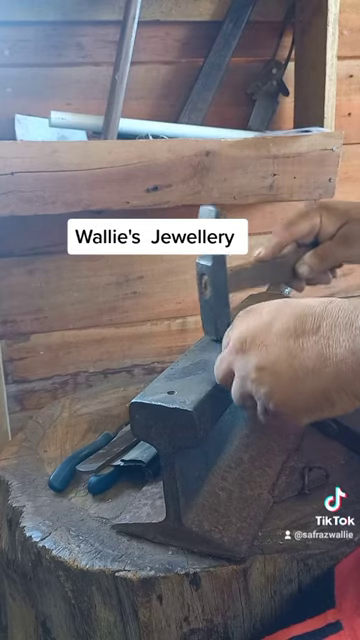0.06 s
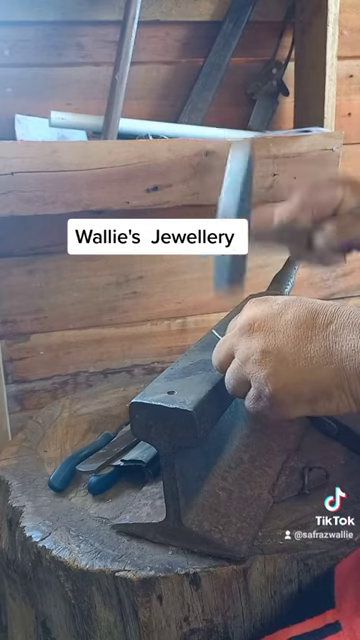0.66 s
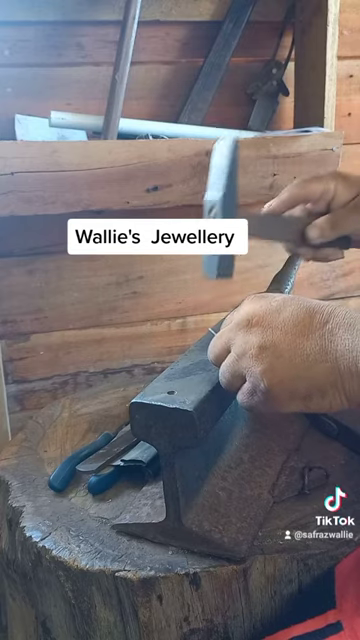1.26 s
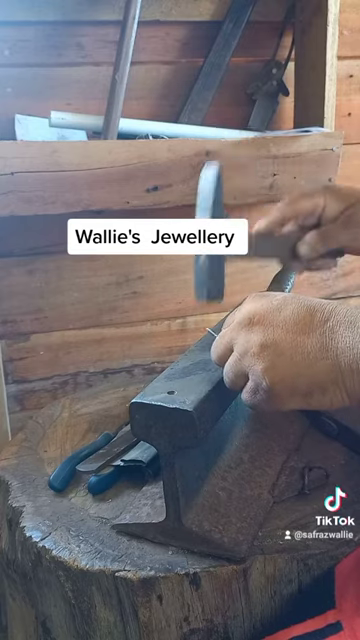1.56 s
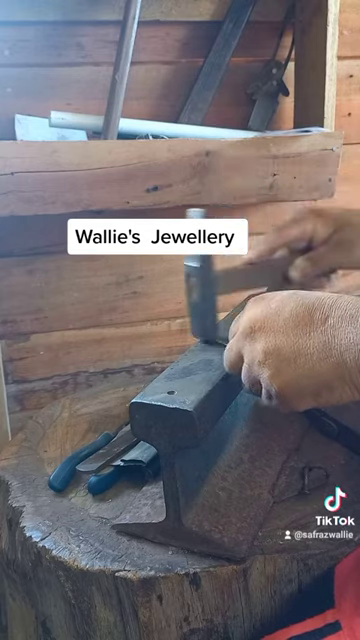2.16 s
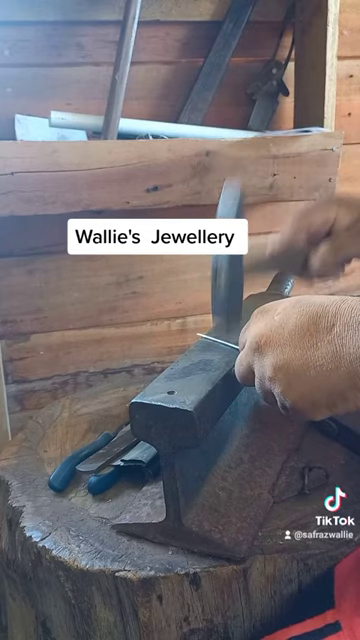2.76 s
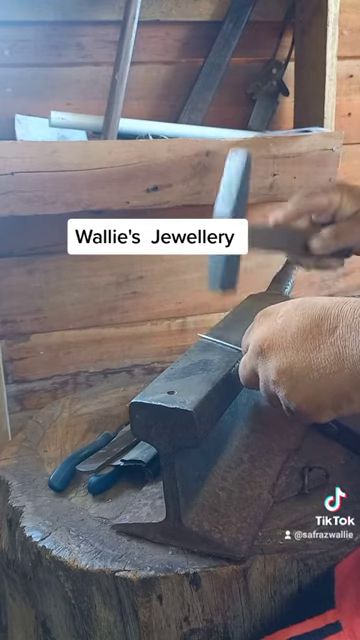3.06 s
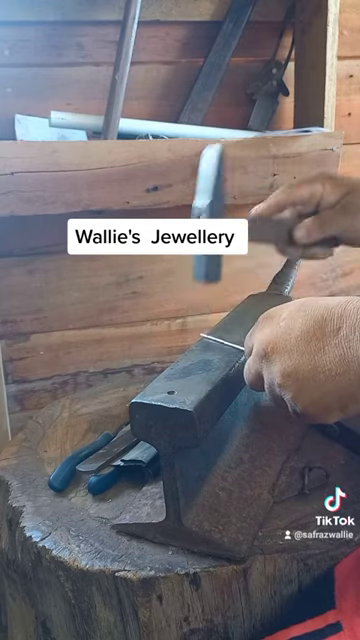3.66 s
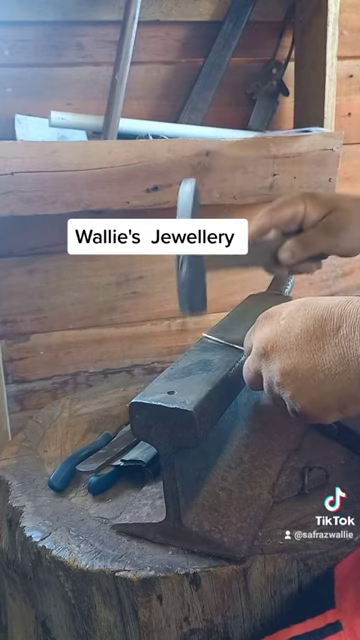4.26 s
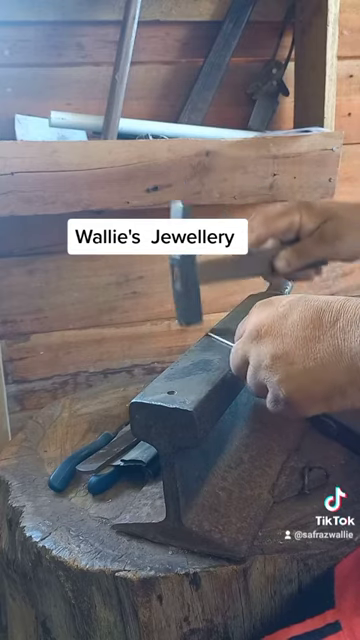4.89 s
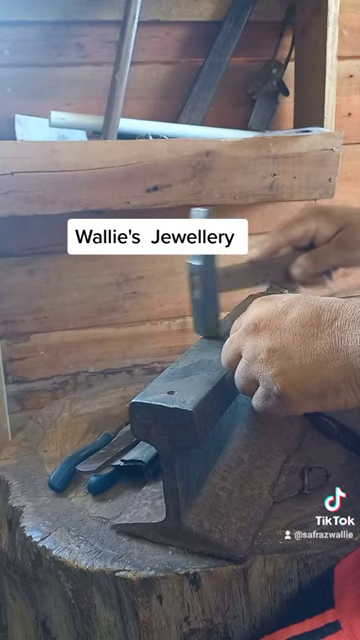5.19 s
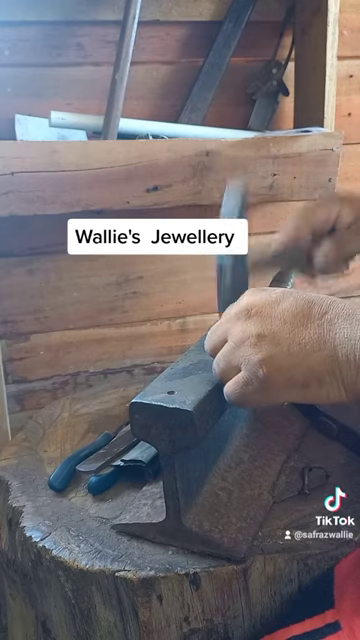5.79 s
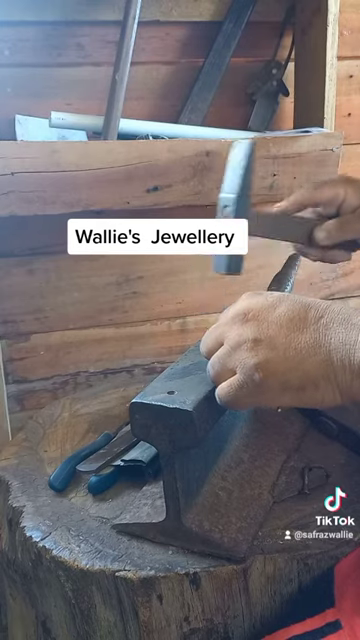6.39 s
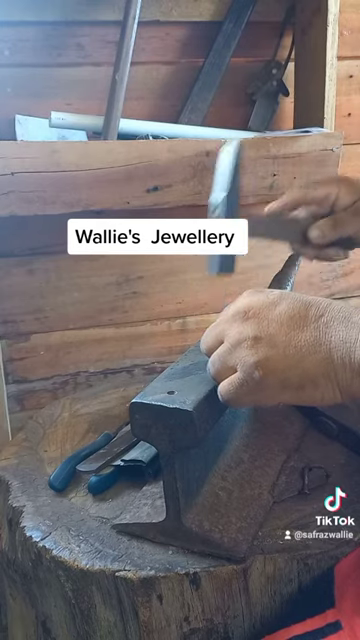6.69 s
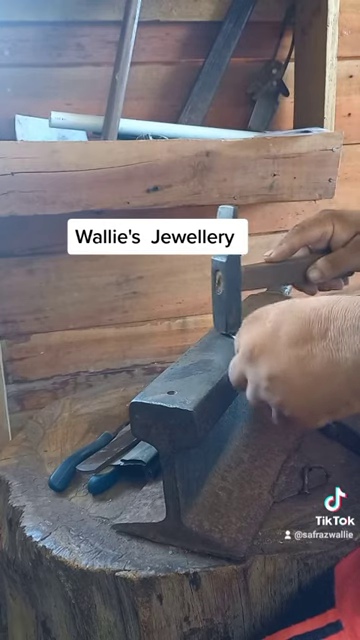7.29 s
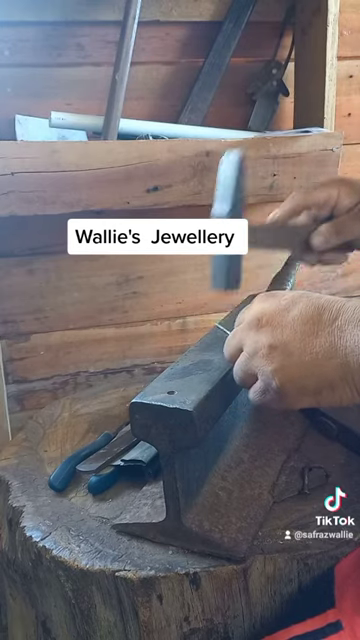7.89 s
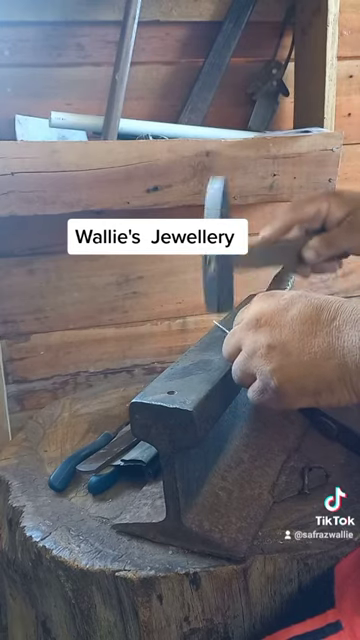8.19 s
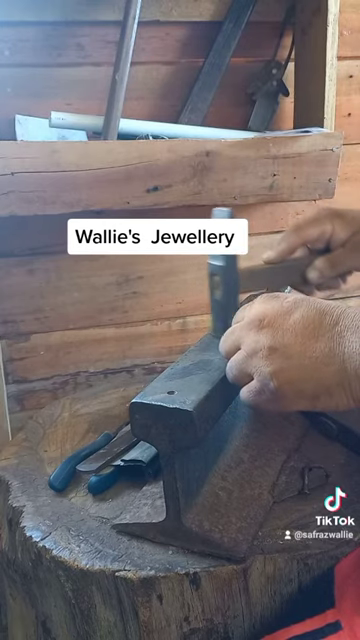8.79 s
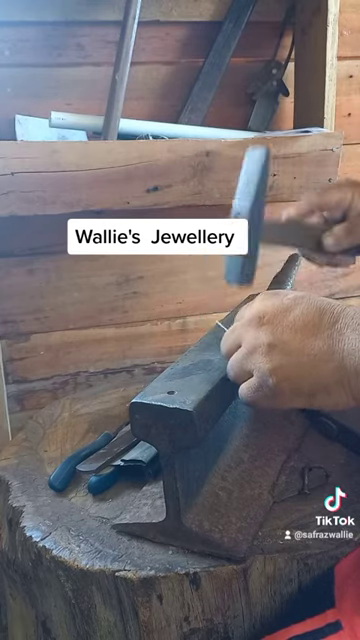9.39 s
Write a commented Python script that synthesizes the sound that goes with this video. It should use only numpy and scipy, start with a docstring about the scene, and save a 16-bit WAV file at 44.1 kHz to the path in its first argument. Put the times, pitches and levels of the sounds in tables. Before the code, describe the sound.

A small hammer flattens a metal strip on a steel anvil set on a tree stump, about three blows a second. Each blow is a sharp crack with a short bright ring and a low thud, thickened by nearby plank walls. After a long even run it pauses briefly, the strip faintly rubs and knocks, then the hammering resumes. The microphone is close, with a quiet outdoor hush behind.

```python
"""Hammering metal in a shed

A small hammer flattens a metal strip on a rail anvil set on a tree stump, about three blows a second.
Each blow is a crack, a thud of the stump and a short ring of steel, thickened by close plank walls.
The force is nearly even; how squarely and where the hammer lands sets the brightness and the rings.
In the one pause the hand shifts the strip and a faint whistle sounds.
Now and then a thin hiss falls in pitch over a quiet outdoor hush."""
import sys
import numpy as np
from scipy import signal
from scipy.fft import rfft, irfft, next_fast_len
from scipy.io import wavfile
from scipy.ndimage import uniform_filter1d, map_coordinates

SR = 44100
rng = np.random.default_rng(int(sys.argv[2]) if len(sys.argv) > 2 else 0)


def store_pcm(level_fs):
    """Save levels as 16-bit WAV."""
    pcm = np.round(np.clip(level_fs, -1, 1) * 32767).astype(np.int16)
    wavfile.write(sys.argv[1], SR, np.atleast_2d(pcm).T)


N = 425565
SIZE = 40960  # samples in one blow with its echoes
HZ = np.fft.rfftfreq(SIZE, 1 / SR)


def amp(db):
    """Turn decibels into a gain."""
    return 10 ** (np.asarray(db) / 20)


def unit(x):
    """Scale x to an average power of 1."""
    return x / np.sqrt(np.mean(x ** 2) + 1e-20)


def along(points, hz):
    """Read between rows of frequency and value, on a log frequency scale."""
    f, v = np.transpose(points)
    return np.interp(np.log(hz + 1), np.log(f + 1), v)


def filtered(x, response):
    """Scale each frequency in x by response(hz)."""
    n = x.shape[-1]
    m = next_fast_len(n + SR // 2)
    return irfft(rfft(x, m) * response(np.fft.rfftfreq(m, 1 / SR)), m)[..., :n]


def causal(gain):
    """A spectrum with this gain whose sound starts only when it is struck."""
    cepstrum = irfft(np.log(np.maximum(gain, 1e-6)))
    forward_only = np.r_[1, np.full(SIZE // 2 - 1, 2), 1, np.zeros(SIZE // 2 - 1)]
    return np.exp(rfft(cepstrum * forward_only))


def to_sound(spectrum):
    """Turn a blow's spectrum into sound that fades to silence."""
    return irfft(spectrum) * np.clip(np.linspace(4, -1, SIZE), 0, 1)


def panned(db):
    """Two gains of fixed total power, the left db above the right."""
    pair = np.array([amp(db / 2), amp(-db / 2)])
    return pair / np.sqrt(np.mean(pair ** 2, axis=0))


def stereo_noise(size):
    """White noise at two microphones: alike in the bass, unrelated in the treble."""
    # Each row: frequency in Hz, likeness of left and right (1 is identical).
    likeness = [(220, 0.95), (700, 0.87), (1400, 1), (5000, 0.019)]
    turn = lambda hz: np.arccos(np.clip(along(likeness, hz), -1, 1)) / 2
    shares = lambda hz: np.array([np.cos(turn(hz)), np.sin(turn(hz))])
    mid, side = filtered(rng.standard_normal((2, size)), shares)
    return np.array([mid + side, mid - side])


def noise_band(size, pitch_hz, width_hz):
    """Stereo noise gathered around one pitch."""
    return unit(filtered(stereo_noise(size), lambda hz: 1 / (1 + ((hz - pitch_hz) / width_hz) ** 2)))


def add(out, start, sound):
    """Mix a sound into out, from start seconds on."""
    part = out[:, max(round(start * SR), 0):][:, :sound.shape[-1]]
    part += sound[..., :part.shape[-1]]


def hush(db):
    """The steady, distant noise of the outdoors."""
    # Each row: frequency in Hz, relative level in dB.
    colour = [(25, -30), (42, -20.5), (65, -2.5), (130, -4.5), (250, -18.5), (500, -23.5), (1200, -29.5),
              (2100, -23), (2800, -32), (4000, -24), (6000, -30), (10000, -32.5), (15000, -44.5)]
    return amp(db) * unit(filtered(stereo_noise(N), lambda hz: amp(along(colour, hz))))


def falling_hisses(width_hz):
    """Faint, narrow bands of noise slide down in pitch."""
    # Each row: start in seconds, level in dB.
    hisses = [(0.031, -58.5), (4.148, -54), (7.061, -58)]
    # Each row: seconds into a hiss, pitch in Hz, level change in dB.
    glide = [(0, 8800, -19), (.08, 8000, -1), (.14, 7070, -5.5), (0.199, 6440, -2), (0.272, 6250, -7.5),
             (.35, 6140, -10)]
    out = np.zeros((2, N))
    times, pitch, change_db = np.transpose(glide)
    t = np.arange(int(times[-1] * SR)) / SR
    tone = np.exp(2j * np.pi * np.cumsum(np.interp(t, times, pitch)) / SR)
    fade = signal.windows.tukey(len(t), .2)
    keep_lows = lambda f: 1 / (1 + f / width_hz) / (1 + (f / 2500) ** 4)
    for start, db in hisses:
        flutter = filtered(rng.standard_normal((2, 2, len(t))), keep_lows)
        hiss = unit(flutter[0] * tone.real + flutter[1] * tone.imag)
        add(out, start, hiss * amp(db + np.interp(t, times, change_db)) * fade)
    return out


def hand_bumps(width_hz):
    """The hand resettles the strip with dull, soft knocks."""
    # Each row: start in seconds, level in dB, pitch in Hz, seconds to fade by 60 dB.
    bumps = [(.295, -63, 170, 0.11), (7.366, -48.5, 272, .25)]
    out, t = np.zeros((2, N)), np.arange(SR // 2) / SR
    rise = 1 - np.exp(-t / 0.0041)
    for start, db, hz, fade_s in bumps:
        add(out, start, noise_band(len(t), hz, width_hz) * amp(db - 60 * t / fade_s) * rise)
    return out


def shed(walls_fade_s):
    """The path to the microphones, as a spectrum: straight sound, plank echoes and a low boom."""
    # The boom. Each row: frequency in Hz, dB against the first echoes.
    boom_db = [(110, -7), (200, -2.5), (400, -17.5), (700, -29.5), (2000, -35.5), (2800, -30), (5000, -27),
               (8000, -36)]
    # Each row: frequency in Hz, seconds for the boom to fade by 60 dB.
    boom_fade = [(110, 0.78), (300, 0.41), (1000, 0.84), (3000, 0.8), (4500, 0.45)]
    # The straight sound. Each row: frequency in Hz, dB against the echoes.
    straight = [(150, -3), (400, -7.5), (900, -8.5), (2500, -11.5), (8000, -28.5)]
    hz, t, noise = signal.stft(stereo_noise(SIZE), SR, nperseg=256)
    boom = amp(along(boom_db, hz)[:, None] - 60 * t / along(boom_fade, hz)[:, None])
    walls = amp(-60 * t / walls_fade_s)
    echoes = signal.istft(noise * np.hypot(walls, boom), SR, nperseg=256)[1][:, :SIZE]
    return rfft(unit(echoes)) / np.sqrt(SIZE) + amp(along(straight, HZ))


def evened(path, width_hz):
    """Level out a path's broad tone colour but keep its fine ripple."""
    smooth = lambda v: uniform_filter1d(v, max(int(width_hz / HZ[1]), 1), axis=-1)
    power = smooth(smooth(np.abs(path) ** 2))
    return path * causal(1 / np.sqrt(np.abs(power) + 1e-9))


def contact_colour(db):
    """The broad crack and thud of contact, with fine random peaks and dips in the treble."""
    # Each row: frequency in Hz, relative level in dB.
    colour = [(40, -53), (80, -30.5), (115, -14.5), (150, -16), (205, -23.5), (300, -15), (480, -19),
              (640, -23), (850, -19.5), (1200, -24), (2000, -15), (2800, -23.5), (3700, -23.5),
              (6500, -33.5), (8000, -33.5), (9800, -44.5), (15000, -42.5)]
    # Each row: frequency in Hz, left over right in dB.
    sides = [(150, 0), (350, 1), (700, -2.5), (2100, -10), (3500, -3.5), (6500, -12), (9000, 1)]
    knots = HZ / 70  # a new random value every 70 Hz
    depth_db = along([(1500, 0), (4000, 1.5), (8000, 3), (10000, 6)], HZ)
    ripple_db = depth_db * map_coordinates(rng.standard_normal(int(knots[-1]) + 4), [knots])
    return amp(db + along(colour, HZ) + ripple_db) * panned(along(sides, HZ))


def ring_boost_db(hz, start, spot):
    """The landing spot, the work's creep along the rail and chance favour some rings."""
    # Each row: pitch in Hz, dB at the middle of the face, dB per unit of spot, dB per second of creep.
    spot_rings = [(1709, -1, 4, 1), (4515, 2.5, 9.5, 0), (4950, 0.6, -0.5, 0.22), (6020, -2.5, -2.9, -0.2),
                  (7190, 1.5, 0.2, -0.3)]
    # Each row: frequency in Hz, random spread between blows in dB.
    scatter = [(400, .8), (2000, 1.2), (6000, 1.6)]
    ring_hz, middle_db, spot_db, creep_db_per_s = np.transpose(spot_rings)
    matches = np.abs(hz[:, None] / ring_hz - 1) < .02
    place_db = middle_db + spot_db * spot + creep_db_per_s * (start - N / SR / 2)
    return matches @ place_db + along(scatter, hz) * rng.standard_normal(len(hz))


def resonator(pitch_hz, width_hz):
    """The spectrum of one ring: the narrower it is, the longer it lasts."""
    return 1j * HZ * width_hz / (pitch_hz ** 2 - HZ ** 2 + 1j * HZ * width_hz)


def hammering(ring_db, contact_db, ring_direct_db, extra_damping_hz, stump_hz, rock_db, rock_delay_s):
    """Each blow cracks, sets the steel ringing and rocks the stump, all heard through the shed."""
    # Each row: start in seconds, force in dB, hardness in dB, spot on the face (0 is the middle).
    blows = [(0.3805, 0.6, -4.5, -1.7), (0.7287, 1.1, -0.5, 0.4), (1.0766, 2.2, -0.5, 0.2),
             (1.4168, 0.5, 2.5, -0.49), (1.763, 1.14, 0.5, 0.37), (2.11, 0.5, 3.5, -0.052),
             (2.4606, 0.46, -1, -0.21), (2.8053, 1, -1.5, -0.033), (3.1407, 0.1, 1, -0.58),
             (3.4803, 1.3, -1, -0.49), (3.8067, -0.1, 2.5, -0.94), (4.14, -0.4, 2.5, -0.044),
             (4.4796, -2, 7, -1.1), (4.8126, -0.2, 2.0, -0.24), (5.1586, 0.26, 1.5, 0.49),
             (5.5005, 0.7, 3, 0.11), (5.8358, 0, 2.0, -0.3), (6.1727, 0.9, 1, 0.54),
             (6.5057, 0.5, 0, -0.94), (6.833, 0.84, 1, -1.0), (7.714, 0.8, -1.5, 0.79),
             (8.071, -0.1, -0.5, 0.45), (8.4174, 0.4, 0, 0.3), (8.768, 1.06, -0.5, 0.13),
             (9.1292, 0.45, -4, 0.19), (9.4797, -0.5, -2.5, -0.7)]
    # The rings of anvil, hammer and stump. Each row: pitch in Hz, relative energy in dB,
    # seconds to fade by 60 dB before extra damping, left over right in dB.
    rings = [(270.0, 1.5, 0.24, -3.0), (376.0, 5.0, 0.05, -15.0), (450, -2, 0.22, -2), (560, -6, 0.2, -2),
             (689.0, -3.8, 0.082, 2.0), (1041.0, -1.5, 0.07, -8.0), (1378.0, -1.0, 0.12, -15.0),
             (1528.0, 2.2, 0.073, -14.0), (1709.0, 4.8, 0.176, -15.0), (1790.0, 4.5, 0.063, -14.0),
             (1860.0, 7.4, 0.033, -12.0), (1951.0, 7.5, 0.076, -15.0), (2285.0, 5.5, 0.07, -15.0),
             (3226.0, -1.8, 0.08, -1.0), (3561.0, 3.1, 0.015, -8.0), (4498.0, 5.6, 0.063, 0.0),
             (4524.0, 1.4, 0.09, 3.0), (4932.0, 7.5, 0.024, -2.0), (4970.0, 9.6, 0.15, 2.0),
             (5388.0, 3.3, 0.044, -11.0), (5980.0, 4.3, 0.15, -5.0), (6064.0, -1.0, 0.19, -2.0),
             (7190.0, 3.5, 0.11, -8.0), (7562.0, -1.4, 0.044, -5.0), (8293.0, 1.3, 0.062, 7.0),
             (8704.0, 3.1, 0.026, 1.0), (9383.0, -11.0, 0.049, -3.0), (11318.0, -8.3, 0.049, 3.0),
             (12973.0, -9.5, 0.131, -4.0), (15148.0, -9.6, 0.062, 1.0)]
    # A squarer, harder hit is shorter, so brighter. Each row: frequency in Hz, dB per dB of hardness.
    treble_lift = [(2500, 0), (4500, 0.82), (5000, 1.6), (6000, 1.33), (7500, 0.96), (12000, 0.83)]
    out = np.zeros((2, N))
    hz, energy_db, fade_s, pan_db = np.transpose(rings)
    # a little extra damping shortens every ring
    width = (np.log(1000) / np.pi / fade_s + extra_damping_hz)[:, None]
    # each ring takes a moment to build, which keeps the pitches between rings quiet
    resonance = resonator(hz[:, None], width) * resonator(hz[:, None], 6 * width + 60)
    ring_power = np.abs(resonance.T) ** 2
    contact = contact_colour(contact_db)
    # the heavy stump answers late, so the bass trails the crack
    lag = (1 - 2 * resonator(stump_hz, stump_hz)) ** 2
    left_late_s = .00012  # the anvil stands to the right
    arrival = np.exp(np.pi * 1j * HZ * left_late_s * np.array([[-1], [1]]))
    still_path, *fresh_paths = [shed(walls_fade_s=0.24) for _ in range(len(blows) + 1)]
    moved = .35  # share of the echoes changed by the moving hands and hammer
    for (start, force_db, hardness_db, spot), fresh in zip(blows, fresh_paths):
        path = evened(np.sqrt(1 - moved) * still_path + np.sqrt(moved) * fresh, width_hz=94)
        drive_db = lambda f: force_db + hardness_db * along(treble_lift, f)
        level_db = ring_db + energy_db + drive_db(hz) + ring_boost_db(hz, start, spot)
        # the rail faces the microphones, so more of its ring arrives straight
        ring_path = path + amp(ring_direct_db)
        energy = np.abs(ring_path) ** 2 @ ring_power * 2 / SIZE
        sign = rng.choice([-1, 1], (2, len(hz))) ** (hz > 1200)  # only high rings flip
        ring = (sign * amp(level_db) * panned(pan_db) / np.sqrt(energy)) @ resonance
        crack = causal(contact * amp(drive_db(HZ))) * np.sqrt(SR / 2)
        add(out, start, to_sound(arrival * lag * (path * crack + ring_path * ring)))
        # the stump rocks back with a soft, low thump
        thump = to_sound(path * resonator(pitch_hz=150, width_hz=110) ** 2) * np.sqrt(SR / 2)
        add(out, start + rock_delay_s, thump * amp(rock_db + force_db))
    return out


def sliding_strip(grain_db):
    """The strip rubs unevenly over the steel as the hand moves it."""
    # Each row: time in seconds, level in dB.
    swell = [(7.05, -95), (7.2, -68), (7.33, -65), (7.42, -64.5), (7.52, -92)]
    # Each row: frequency in Hz, relative level in dB.
    colour = [(200, -12.5), (450, -1), (1000, -1.5), (1600, -11), (3600, -16.5), (4100, -11.5), (4500, -17),
              (9000, -35.5)]
    t = np.arange(N) / SR
    catching = unit(uniform_filter1d(rng.standard_normal(N), SR // 80))
    grainy = stereo_noise(N) * amp(grain_db * catching)
    rub = unit(filtered(grainy, lambda hz: amp(along(colour, hz))))
    return rub * amp(np.interp(t, *np.transpose(swell), left=-120, right=-120))


def whistle(start, length_s, pitch_hz, width_hz, db):
    """A thin, far-off whistle swells and fades on one pitch."""
    out, size = np.zeros((2, N)), int(length_s * SR)
    swell = np.sin(np.linspace(0, np.pi, size))
    add(out, start, amp(db) * noise_band(size, pitch_hz, width_hz) * swell)
    return out


def scene():
    """The hammer close by, over the quiet yard."""
    blows = hammering(ring_db=-2.22, contact_db=-0.62, ring_direct_db=-3.5, extra_damping_hz=2,
                      stump_hz=223, rock_db=-29, rock_delay_s=0.13)
    hand = hand_bumps(width_hz=180) + sliding_strip(grain_db=3)
    yard = falling_hisses(width_hz=340) + hush(db=-60.5)
    yard += whistle(start=7.08, length_s=.26, pitch_hz=4054, width_hz=40, db=-69)
    return blows + hand + yard


def record(dry):
    """The microphone rounds off the tallest peaks and cuts the highest treble."""
    ceiling, top_hz = .9, 15500
    rounded = dry / (1 + np.abs(dry / ceiling) ** 4) ** (1 / 4)
    return filtered(rounded, lambda hz: 1 / np.sqrt(1 + (hz / top_hz) ** 160))


dry = scene()
out = record(dry)
store_pcm(out)
```